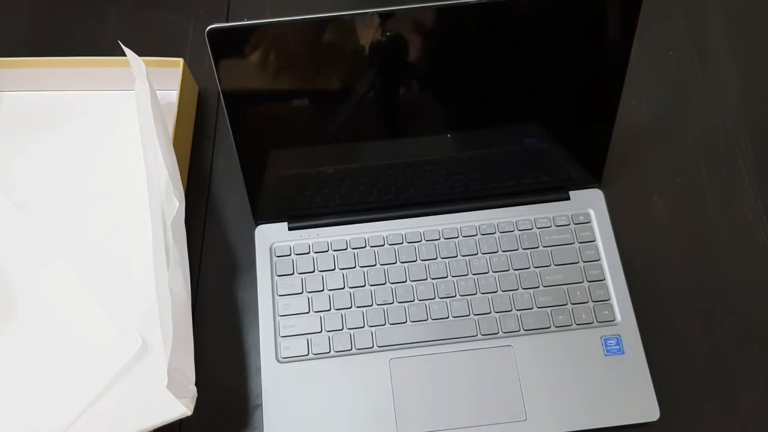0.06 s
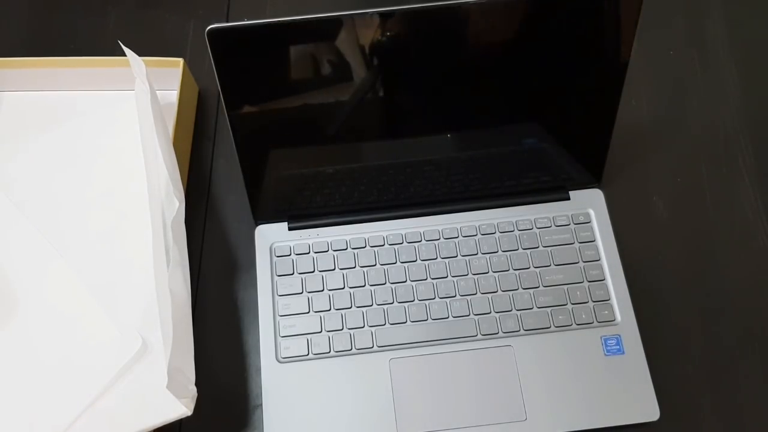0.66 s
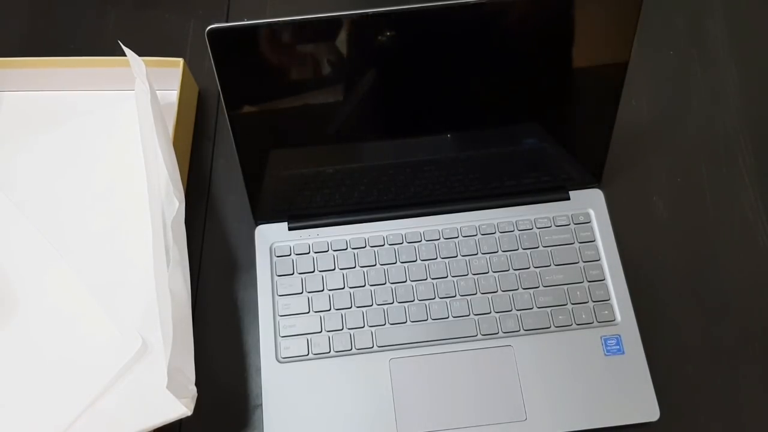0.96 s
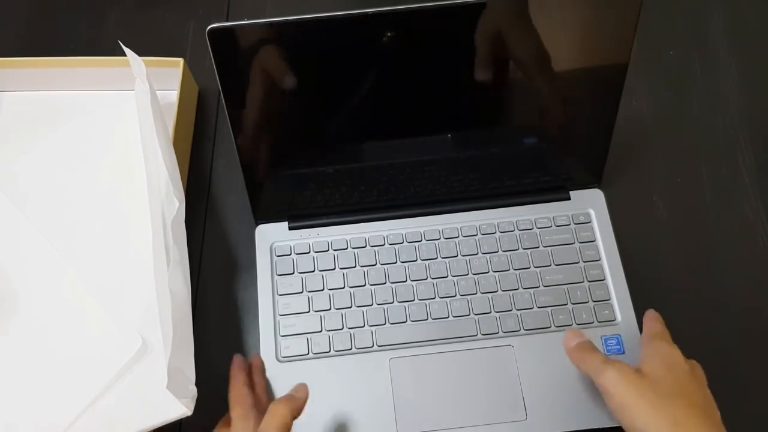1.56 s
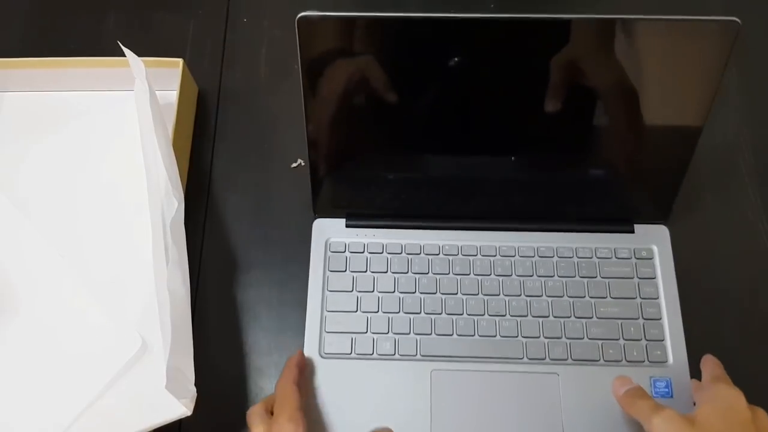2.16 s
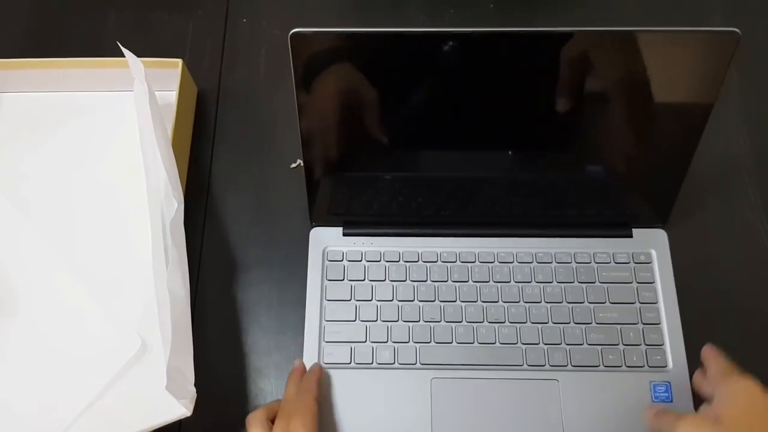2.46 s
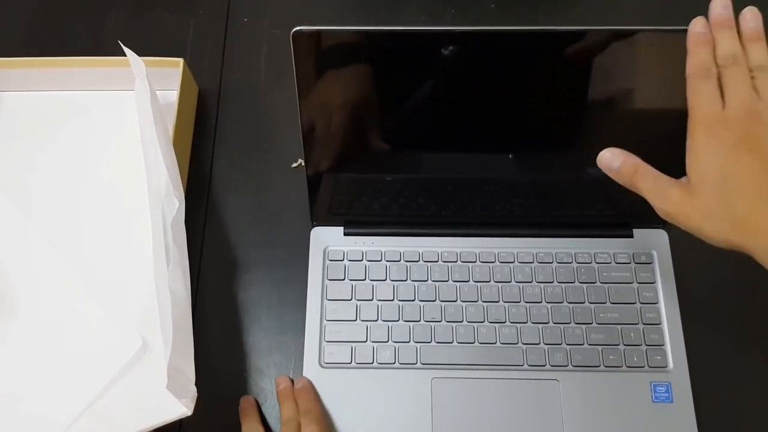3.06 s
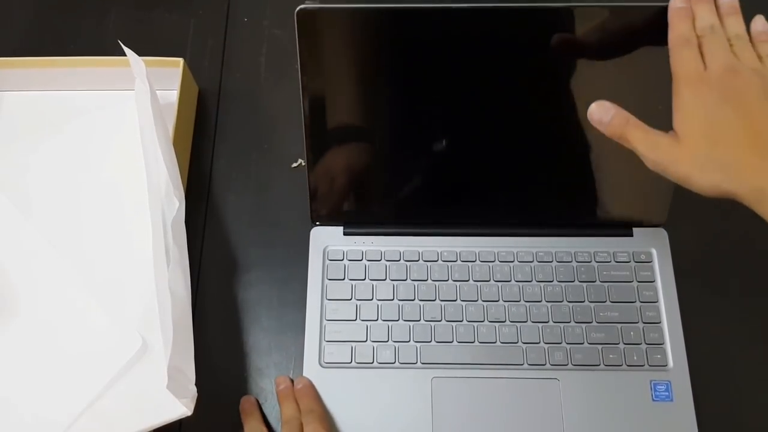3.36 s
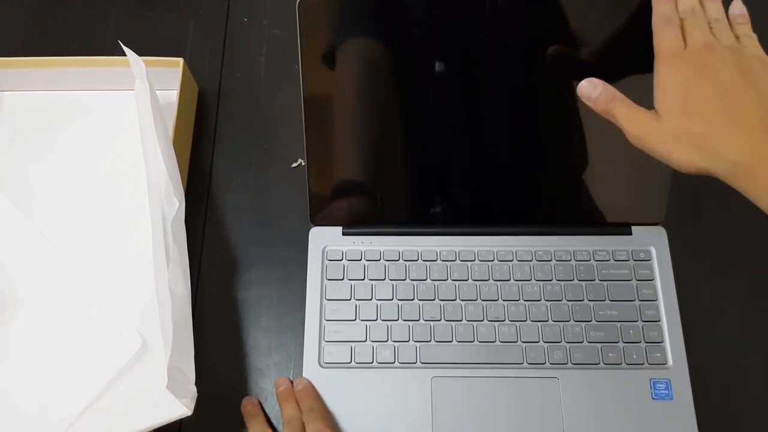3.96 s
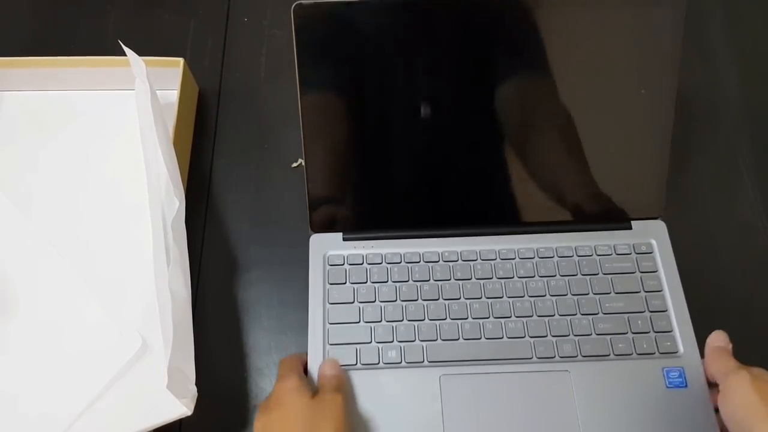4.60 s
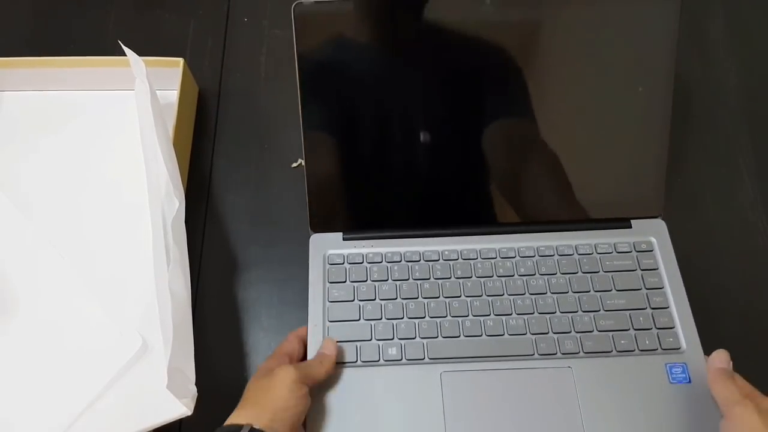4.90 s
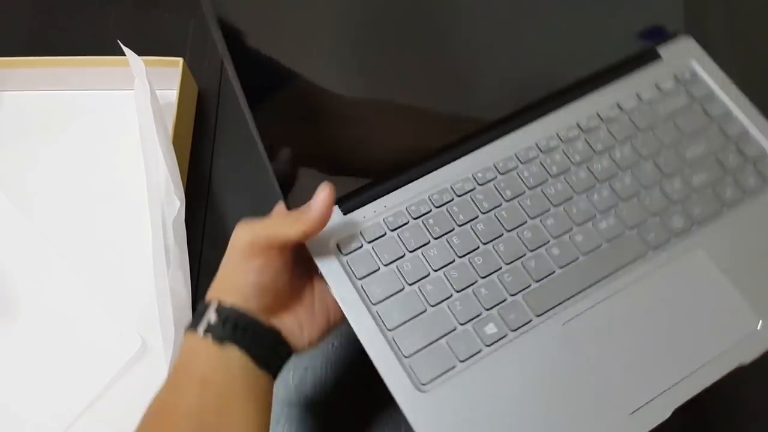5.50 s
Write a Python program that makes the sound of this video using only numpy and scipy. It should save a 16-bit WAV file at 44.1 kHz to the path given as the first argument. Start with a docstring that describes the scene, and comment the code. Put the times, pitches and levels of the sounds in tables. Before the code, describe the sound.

At about 0.4 seconds something lands on a wooden table with a quick clatter and scuff that briefly rings the top. This is the loudest sound, and a smaller knock follows at 0.7. Faint brushing comes just after 1 second. From 1.5 to 2.4 seconds a laptop is dragged round in four short pushes, its rubber feet juddering, scraping and grinding fine grit, with light bumps. A finger slips off with a tiny squeak at 2.6. Skin rubs softly near 2.8, and gentle taps come at 3.3 as the lid is tilted back. Between 4.3 and 4.8 seconds fingers grip the laptop, thudding on its hollow base and rubbing the case. Another light tap at 5.2 and a faint skin hiss accompany the lift, until about 5.6. Everything is close to a stereo microphone in a small, bare room, over a low, steady hum.

```python
"""A laptop dragged round on a wooden table, close to a phone's stereo microphone in a small, bare room.
First something is set down with a clatter that rings the table top. Then the laptop turns in four
pushes: its rubber feet stick and slip, scrape through the shell and grind fine grit. The lid is tilted
back and the laptop gripped and lifted, fingers thudding on the hollow base and skin brushing the case.
A low room hum lies underneath."""
import sys
import numpy as np
from scipy import signal
from scipy.fft import rfft, irfft, next_fast_len
from scipy.io import wavfile

SR = 44100
rng = np.random.default_rng(int(sys.argv[2]) if len(sys.argv) > 2 else 0)


def store_wav(level_fs):
    """Save 16-bit WAV to argv[1]."""
    pcm = np.round(np.clip(np.atleast_2d(level_fs), -1, 1) * 32767)
    wavfile.write(sys.argv[1], SR, pcm.T.astype(np.int16))


N = 248842
T = np.arange(N) / SR

# the laptop's hollow base, damped by the hands: (frequency [Hz], gain [dB], t60 [s])
BASE_MODES = [(118.5, 1.5, 0.4), (272.4, 1.5, 0.2), (378, -4.5, 0.071), (417.5, -3.5, 0.36),
              (507, -13, 0.73)]


def dragging(trim_db=-6, sides=2):
    """Rubber feet judder on the wood, scrape through the shell and grind grit; one sound per side."""
    # pushes: (fastest at [s], speeding up [s], slowing [s], judder [dB], scrape [dB], grit [dB])
    pushes = [(1.54, 0.072, 0.13, -41.5, -57, -62), (1.618, 0.082, 0.074, -40, -47.5, -51),
              (1.692, 0.013, 0.051, -42.5, -51, -58.5), (1.868, .105, 0.097, -35.5, -42, -52.5),
              (2.05, 0.14, 0.16, -47, -44.5, -49.5), (2.108, 0.063, 0.059, -38.5, -45.5, -41.5),
              (2.305, 0.066, 0.052, -35, -45.5, -50.5), (2.372, .015, 0.05, -53, -68, -64)]
    # spectra of the feet, the scrape and the grit: (frequency [Hz], gain [dB])
    judder_colour = [(60, -58), (115, 9.5), (200, 1.5), (300, 6), (430, 0.5), (600, -10), (1000, -10.5),
                     (2000, -53.5)]
    scrape_colour = [(250, -30), (550, -14), (900, -12.5), (1350, -1.5), (1700, -1.5), (2100, -3.5),
                     (2500, -7), (3200, -35), (5000, -40), (9000, -52)]
    grit_colour = [(1200, -42), (2800, 2.5), (4300, 2.5), (6000, -1.5), (7800, -5.5), (9000, 0),
                   (11500, -2), (15000, -17.5)]
    # the feet judder even when slow; scrape and grit need speed
    judder_level, scrape_level, grit_level = strokes(pushes, powers=(1.3, 2.6, 2.2))
    for _ in range(sides):
        judder = unit(colour(slips(per_s=320, spread_db=2.0, patchy_db=2.5), judder_colour))
        grains = slips(per_s=1600, spread_db=6.5, patchy_db=2.5)
        scrape = unit(colour(through_shell(grains, shell_db=3), scrape_colour))
        grit = unit(colour(grains, grit_colour))
        yield undb(trim_db) * (judder_level * judder + scrape_level * scrape + grit_level * grit)


def tapping():
    """Fingers and feet thud on the base; nails and the set-down thing's edges tick brightly."""
    # bumps of fingers and feet: (time [s], thud [dB], thud pitch [Hz], click [dB], click top [Hz])
    taps = [(1.495, -37, 330, -60, 2010), (1.689, -43.5, 500, -51, 2000), (1.766, -40, 199, -54, 2000),
            (1.876, -37.5, 188, -58, 2000), (1.985, -41, 171, -64, 2000), (2.241, -36.5, 125, -72, 2000),
            (2.272, -41.5, 295, -61, 2000), (2.307, -39, 367, -52, 1990), (3.3, -47, 340, -73, 5000),
            (3.338, -38, 395, -54, 1090), (4.33, -54, 496, -53.5, 6400), (4.433, -37.5, 396, -59, 5100),
            (4.46, -47, 408, -59, 7000), (4.506, -32.5, 310, -48.5, 6000), (4.556, -55, 604, -50.5, 1990),
            (4.702, -41.5, 335, -65, 2000), (5.168, -46.5, 295, -54, 2000)]
    # faint, bright ticks of the set-down thing's edges and of nails: (time [s], level [dB])
    ticks = [(.44, -53), (.469, -44), (0.974, -69.5), (3.8, -72.5), (4.125, -66)]
    tick_band_hz = (6500, 13000)
    events = list(thud_and_click(taps, thud_spread=1.69, click_low_hz=1070))
    events += [(s, db, *tick_band_hz) for s, db in ticks]
    return blows(events, BASE_MODES, ring_db=-44.5, rattle_db=-6, rattle_t60=0.059,
                 contact_s=0.0008, rattle_hz=636)


def brushing(trim_db=-3, lift_s=5.36, lift_db=2):
    """Each touch rubs the shell and hisses, both swelling and fading together."""
    # brushing touches: (firmest at [s], pressing [s], easing off [s], rub [dB], skin hiss [dB])
    brushes = [(.29, 0.043, 0.19, -65.5, -72.5), (1.07, 0.014, .14, -56.5, -63.5),
               (1.3, 0.042, 0.15, -66, -70.5), (2.82, .06, 0.088, -59.5, -77),
               (2.873, 0.05, 0.051, -55.5, -64.5), (4.145, 0.053, 0.075, -63, -68),
               (4.338, 0.014, 0.036, -45.5, -63), (4.35, 0.16, 0.1, -61.5, -65.5),
               (4.465, 0.051, 0.11, -51, -62.5), (4.535, 0.067, 0.058, -50.5, -66.5),
               (4.728, 0.03, .035, -50.5, -68), (4.765, 0.052, 0.13, -63.5, -67),
               (5.09, 0.33, 0.097, -63.5, -65), (5.15, 0.17, 0.079, -49, -69),
               (5.288, 0.027, 0.017, -61, -83), (5.6, 0.17, 0.12, -63.5, -60.5)]
    # spectra of the rub and the skin hiss: (frequency [Hz], gain [dB])
    rub_colour = [(150, -11), (450, 17.5), (800, 6), (1500, 4.5), (2900, -2), (4500, -5), (6500, -17),
                  (9000, -29.5)]
    skin_colour = [(2500, -52), (5000, -3), (7600, -6.5), (8900, 4.5), (11500, -1), (15000, -7)]
    rub_level, hiss_level = strokes(brushes, powers=(1.8, 1.6))
    grains = slips(per_s=6000, spread_db=3.5, patchy_db=4.0)
    rub = unit(colour(through_shell(grains, shell_db=-1.5), rub_colour))
    hiss = unit(colour(grains, skin_colour))
    # lifted towards the microphone, the hiss gains its very top
    lift = undb(lift_db) * np.interp(T, [lift_s, T[-1]], [0, 1])
    hiss += lift * unit(filtered(grains, 7500, "high", order=4))
    return undb(trim_db) * (rub_level * rub + hiss_level * hiss)


def gripping(trim_db=-3):
    """Fingers stick and slip along the edges and sound the hollow base."""
    # hands shifting their hold: (firmest at [s], pressing [s], easing off [s], level [dB])
    grips = [(3.348, 0.077, 0.058, -53), (4.5, 0.12, .09, -43)]
    drive = slips(per_s=600, spread_db=3, patchy_db=1)
    base = sum(undb(db) * resonance(drive, hz, np.log(1000) / (np.pi * t60))
               for hz, db, t60 in BASE_MODES)
    return undb(trim_db) * strokes(grips, powers=(1.2,))[0] * unit(base)


def squeaking(width_s=0.0013):
    """Skin slipping off the smooth case gives a pitched tick, a few cycles long."""
    # a finger letting go: (time [s], pitch [Hz], level [dB])
    squeaks = [(2.592, 1860, -49), (2.612, 2600, -57)]
    return sum(undb(db) * np.exp(-((T - s) / width_s) ** 2) * np.sin(2 * np.pi * hz * T)
               for s, hz, db in squeaks)


def clattering():
    """Something set down near the microphone lands edge by edge and rocks; the table top rings."""
    # landings: (time [s], thud [dB], thud pitch [Hz], click [dB], click top [Hz])
    landings = [(.3935, -45, 372, -44.5, 4000), (.4395, -26, 140, -27, 2190), (.4695, -22, 570, -24, 4040),
                (.483, -35, 810, -31, 2400), (.503, -40, 580, -26.5, 2140), (.706, -33.5, 235, -42, 1180),
                (.838, -53, 150, -72, 1410), (.995, -68, 696, -61.5, 1420)]
    # ringing of the table top: (frequency [Hz], gain [dB], t60 [s])
    table_modes = [(125, 5.5, 0.2), (277.6, -0.5, 0.46), (422, -9, 0.27), (448, -5, .22), (545, 0.5, 0.34),
                   (682, 1, 0.13), (783, -4.5, 0.21), (970, -9, 0.18), (1185, -6, 0.41), (1313, 0, 0.12),
                   (1530, -27, .2), (1765, -7, 0.22), (1910, -9, 0.23), (2715, 0, 0.49)]
    events = thud_and_click(landings, thud_spread=1.6, click_low_hz=536)
    return blows(events, table_modes, ring_db=-51, rattle_db=-11, rattle_t60=0.078,
                 contact_s=0.0034, rattle_hz=940)


def scuffing(trim_db=-2):
    """The same thing scrapes the wood as it is set down."""
    # scuffs: (hardest at [s], pressing [s], easing off [s], level [dB])
    scuffs = [(.4, 0.0095, 0.081, -35), (.463, .035, 0.042, -26.5), (.55, 0.02, 0.061, -40)]
    # spectrum of a scuff: (frequency [Hz], gain [dB])
    scuff_colour = [(80, -9), (130, 16), (200, -5), (300, 5), (480, 9), (660, 4.5), (950, -5), (1300, -4.5),
                    (2000, -3.5), (3300, -15.5), (4600, -17), (7600, -23.5), (9500, -14.5), (15000, -26)]
    grains = slips(per_s=3600, spread_db=-0.5, patchy_db=1.7)
    return undb(trim_db) * strokes(scuffs, powers=(1.4,))[0] * unit(colour(grains, scuff_colour))


def slips(per_s, spread_db, patchy_db, patch_s=0.012):
    """Stick and slip: tiny random releases of uneven size, bunched by the grain of the surface."""
    chance, sizes = rng.random(N), rng.standard_normal(N)
    clicks = (chance < per_s / SR) * np.sign(sizes) * undb(spread_db * np.minimum(abs(sizes), 2))
    knots = np.arange(0, T[-1], patch_s)
    patches = np.interp(T, knots, rng.standard_normal(len(knots)))
    return clicks * undb(patchy_db * patches)


def strokes(rows, powers):
    """Each stroke swells and dies away; every layer follows that effort by its own power law."""
    energy = np.zeros((len(powers), N))
    for s, rise_s, fall_s, *levels in rows:
        during = (T > s - rise_s) & (T < s + fall_s)
        effort = np.sin(np.pi / 2 * np.interp(T[during], [s - rise_s, s, s + fall_s], [0, 1, 0]))
        energy[:, during] += [(undb(db) * effort ** power) ** 2 for db, power in zip(levels, powers)]
    return np.sqrt(energy)


def through_shell(grains, shell_db):
    """Friction grains together with the resonances they stir in the laptop's shell."""
    # resonances of the shell: (frequency [Hz], width [Hz], gain [dB])
    shell_modes = [(1285, 370, -2), (1650, 43, -2), (1630, 24, -10), (2480, 72, 3.5), (3000, 310, -2),
                   (3850, 270, -2)]
    return grains + sum(undb(shell_db + db) * resonance(grains, hz, width)
                        for hz, width, db in shell_modes)


def thud_and_click(rows, thud_spread, click_low_hz):
    """A contact thuds round one pitch; its edge clicks in a band up to the row's own top frequency."""
    for s, thud_db, thud_hz, click_db, top_hz in rows:
        yield s, thud_db, thud_hz / thud_spread, thud_hz * thud_spread
        yield s, click_db, click_low_hz, top_hz


def blows(events, modes, ring_db, rattle_db, rattle_t60, contact_s, rattle_hz, detune=0.0235):
    """Each blow is a crack, a rattle of loose parts and the body's ring, kept to its own band."""
    # spectrum of the short crack: (frequency [Hz], gain [dB])
    crack_colour = [(50, -12), (120, 12.5), (300, 6.5), (650, 1.5), (1000, 1.5), (1900, -3), (3000, -10),
                    (5000, -5.5), (7500, -16.5), (10000, -9.5), (15000, -35)]
    crack = snap(crack_colour)
    out, t = np.zeros(N + SR), T[:SR // 4]
    for s, db, low_hz, top_hz in events:
        # uneven faces meet at many points within milliseconds; the bass feels them as one push
        decay = np.exp(-t / contact_s) + undb(rattle_db - 60 * t / rattle_t60)
        contacts = decay * rng.standard_normal(len(t))
        contacts /= np.sqrt(np.sum(contacts ** 2))
        push = filtered(signal.unit_impulse(len(t)), rattle_hz, "low")
        body = push + filtered(contacts, rattle_hz, "high")
        # each contact loads the body differently and shifts its modes a little
        for (hz, mode_db, t60), load in zip(modes, rng.standard_normal(len(modes))):
            loaded_hz = hz * (1 + detune * load)
            body += undb(ring_db + mode_db - 60 * t / t60) * np.cos(2 * np.pi * loaded_hz * t)
        blow = signal.fftconvolve(body, crack)[:len(t)]
        blow = filtered(filtered(blow, low_hz, "high", order=3), top_hz, "low", order=3)
        blow /= np.sqrt(np.sum(blow ** 2) / (SR / 100))  # the energy of 10 ms at rms 1
        start = int(s * SR)
        out[start:start + len(t)] += undb(db) * blow
    return out[:N]


def room(x, lag_s, tail_db=-1.0, early_db=-4, early_t60=0.027, gap_s=0.0013):
    """Close direct sound, lag_s late on the left, then early reflections and the tail of bare walls."""
    # decay of the room: (frequency [Hz], t60 [s])
    decay_times = [(100, 0.81), (500, 0.46), (1500, 0.5), (4000, 0.44), (9000, 0.44), (15000, 0.45)]
    # spectrum of the reflections: (frequency [Hz], gain [dB])
    wall_colour = [(100, -6), (350, -2), (700, 3.5), (1300, 0.5), (5000, 3), (12000, 1.5)]
    t = T[:SR * 3 // 4]
    bands_hz, t60s = np.transpose(decay_times)
    noise, tail = rfft(diffuse(len(t))), 0
    for band, t60 in zip(np.eye(len(t60s)), t60s):
        share = along(np.column_stack([bands_hz, band]), len(t))
        tail = tail + irfft(noise * share, len(t)) * undb(-60 * t / t60)
    early = diffuse(len(t)) * undb(-60 * t / early_t60)
    arrival = np.clip(t / gap_s - 1, 0, 1)
    reflections = undb(tail_db) * unit(tail * arrival) + undb(early_db) * unit(early * arrival)
    response = colour(reflections / np.sqrt(len(t)), wall_colour)
    direct = np.array([np.roll(x, round(lag_s * SR)), x])
    return direct + signal.fftconvolve(x[None], response, axes=1)[:, :N]


def room_tone(air_db=-53.5, hum_trim_db=-1, waver_hz=7):
    """Even room noise with the wavering hum of something like a fan."""
    # spectrum of the steady noise: (frequency [Hz], gain [dB])
    air_colour = [(33, -37), (44, -9.5), (70, -5.5), (105, -2.5), (160, -7), (290, -11), (480, -16),
                  (1000, -24.5), (1700, -32), (2760, -44), (3850, -41), (4500, -43.5), (5150, -39),
                  (6000, -45), (7400, -49), (8600, -42.5), (10500, -46.5), (15400, -45)]
    # tones of the hum: (frequency [Hz], level [dB])
    hum_tones = [(43, -60.5), (102, -61), (189, -61), (231, -65.5), (301, -62)]
    air = undb(air_db) * unit(colour(diffuse(N), air_colour))
    noise = rng.standard_normal(N)
    hum = sum(undb(db + hum_trim_db) * unit(resonance(resonance(noise, hz, waver_hz), hz, waver_hz))
              for hz, db in hum_tones)
    return air + hum


def diffuse(size):
    """Noise from all sides: both microphone ports hear nearly the same bass but unrelated treble."""
    # stereo width: (frequency [Hz], side over mid [dB])
    width = [(100, -19), (200, -9), (380, -10.5), (700, -1), (1300, 1.5), (4000, -1), (12000, -1)]
    mid, side = rng.standard_normal((2, size))
    return mid + colour(side, width) * np.array([[1], [-1]])


def undb(db):
    """Decibels to gain."""
    return 10 ** (np.asarray(db) / 20)


def unit(x):
    """Scale to rms 1."""
    return x / np.sqrt(np.mean(x ** 2))


def along(points, size):
    """Read (frequency [Hz], value) points at the bins of a transform."""
    hz, value = np.transpose(points)
    return np.interp(np.log(np.fft.rfftfreq(size, 1 / SR) + 1), np.log(hz), value)


def colour(x, points):
    """Equalise x by (frequency [Hz], gain [dB]) points."""
    size = next_fast_len(x.shape[-1])
    return irfft(rfft(x, size) * undb(along(points, size)), size)[..., :x.shape[-1]]


def snap(points, size=1024):
    """The most compact causal pulse with this spectrum."""
    cepstrum = irfft(np.log(undb(along(points, size))))
    cepstrum[1:size // 2] *= 2
    cepstrum[size // 2 + 1:] = 0
    return irfft(np.exp(rfft(cepstrum)))


def filtered(x, hz, kind, order=2):
    """Plain low- or high-pass."""
    return signal.sosfilt(signal.butter(order, min(hz, SR / 2 - 1000), kind, fs=SR, output="sos"), x)


def resonance(x, hz, width_hz):
    """One resonance, gain 1 at its centre."""
    return signal.lfilter(*signal.iirpeak(hz, hz / width_hz, fs=SR), x)


def scene():
    """Table, sliding feet and hands each reach the phone along their own paths through the room."""
    set_down = room(clattering(), lag_s=0.00002) + room(scuffing(), lag_s=0.00004)
    slide = sum(room(side, lag_s=0.00005) for side in dragging())
    contacts = room(tapping() + squeaking(), lag_s=0.00013)
    hands = room(brushing() + gripping(), lag_s=0.00009)
    return set_down + slide + contacts + hands + room_tone()


def record(dry, top_hz=15500):
    """The phone cuts the top treble steeply."""
    return signal.sosfilt(signal.ellip(10, 0.2, 70, top_hz, fs=SR, output="sos"), dry)


dry = scene()
out = record(dry)
store_wav(out)
```